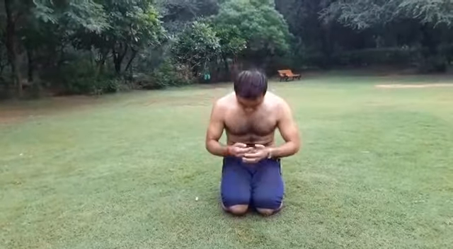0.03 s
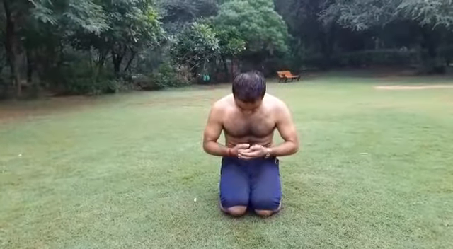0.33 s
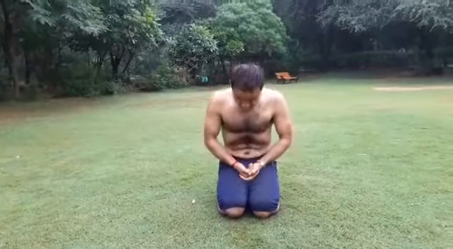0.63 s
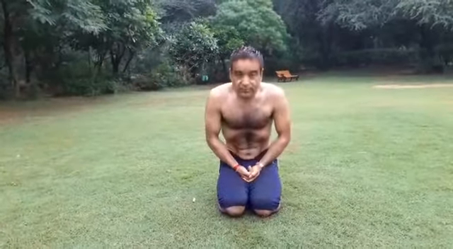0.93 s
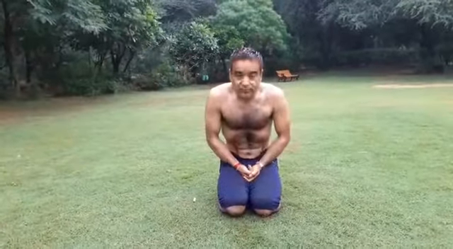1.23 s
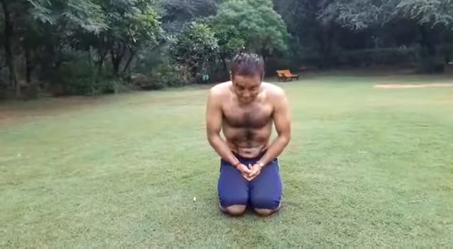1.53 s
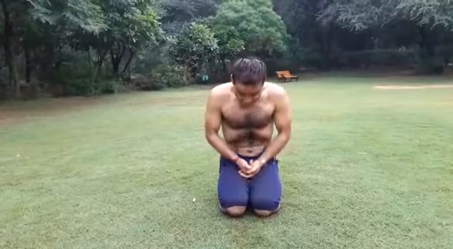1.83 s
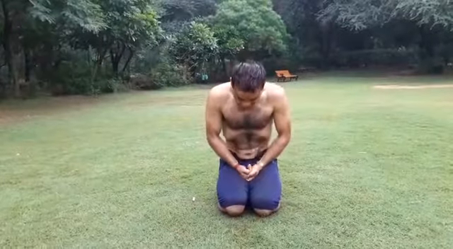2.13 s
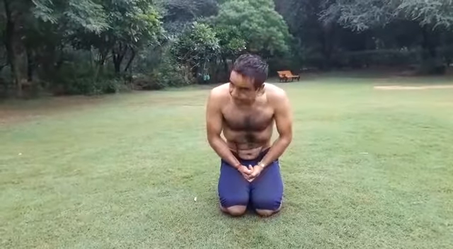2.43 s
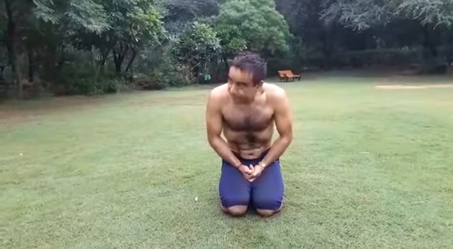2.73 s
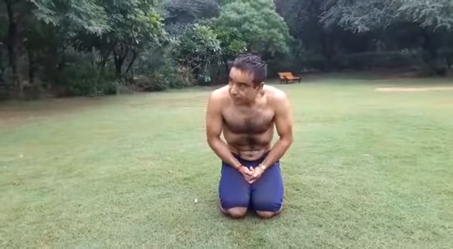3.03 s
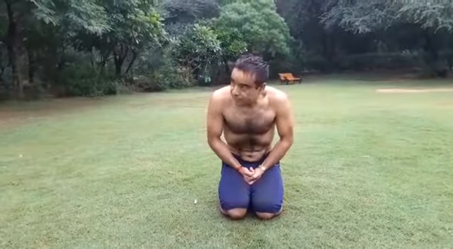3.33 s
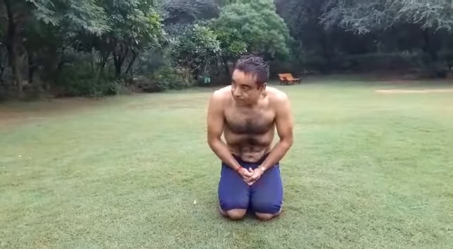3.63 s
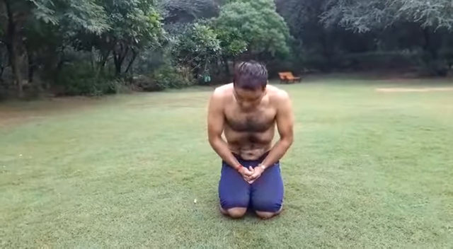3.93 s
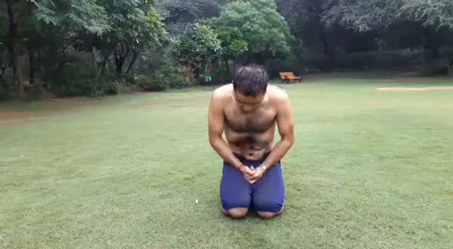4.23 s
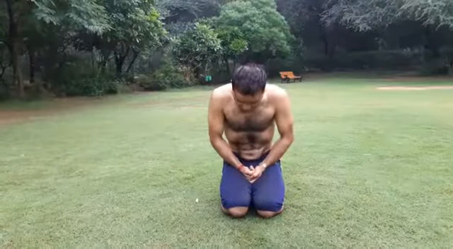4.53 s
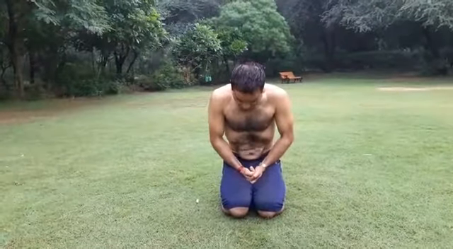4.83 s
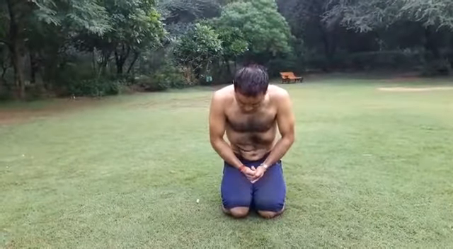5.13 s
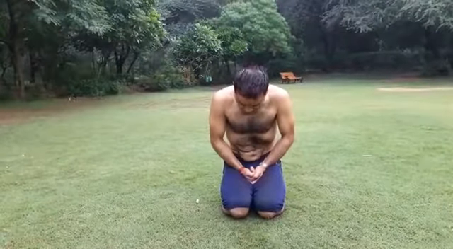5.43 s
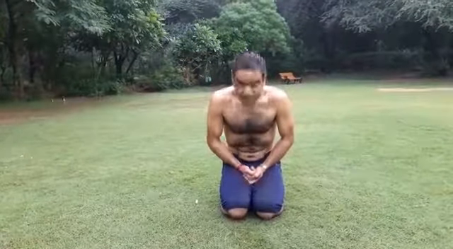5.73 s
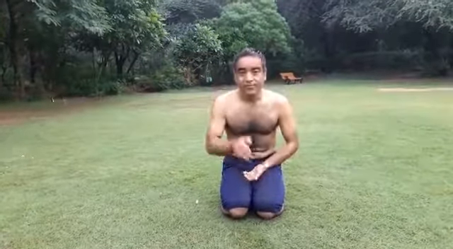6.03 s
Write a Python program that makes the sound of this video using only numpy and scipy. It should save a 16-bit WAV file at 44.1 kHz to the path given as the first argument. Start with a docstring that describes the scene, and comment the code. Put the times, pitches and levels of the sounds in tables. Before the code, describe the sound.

A low bump of wind hits the microphone at the very start, with a brief rustle and the fading echo of a bird call. Parakeets then screech from deep in the trees of a park, each note about a tenth of a second long, high, harsh and raspy, flicking upward at the end. These distant, echoing calls come at about 0.2, 1, 1.9 and 2.7 seconds, with fainter ones between. From 3.5 seconds one bird is close, louder and sharper, calling again at 4.2, 4.9, 5.4 and 6 seconds. Underneath, far traffic makes a steady low rumble, and an engine drone swells around 2 seconds and recedes. Light gusts buffet the microphone, most clearly near 1 and 2 seconds, and faintly stir the leaves. At about 5.8 seconds a far bird adds one very faint, short whistle.

```python
"""A bump of wind and a rustle come first; parakeets screech deep in the trees, then one close by.
Each note starts fairly clean, pulses into a rasp as the syrinx flutters, and ends on a higher tone;
throat and beak filter it, and the foliage scatters it back. Underneath, far traffic rumbles with an
engine drone, light gusts buffet the microphone and stir the leaves, and late on a far bird whistles."""
import sys
import numpy as np
from scipy import signal
from scipy.fft import rfft, irfft, next_fast_len
from scipy.io import wavfile
from scipy.ndimage import map_coordinates

SR = 44100
rng = np.random.default_rng(int(sys.argv[2]) if len(sys.argv) > 2 else 0)


def digitize_waveform(pressure):
    """Quantize a signal to 16-bit integers and store it at the path in sys.argv[1].

    Rows of a 2-D input are taken as channels; values are limited to [-1, 1].
    """
    field = np.atleast_2d(pressure).T
    bounded = np.clip(field, -1, 1)
    quanta = np.round(bounded * 32767).astype(np.int16)
    wavfile.write(sys.argv[1], SR, quanta)


N = 267863
TOP_HZ = 15900  # upper band limit

# spectra of far roads and of the hiss over the lawn: (frequency [Hz], relative density [dB])
ROAD_SPECTRUM = [(22, -43), (32, -51), (48, -3), (65, -17), (110, -0.5), (150, -4.5), (210, -4),
                 (315, -2.5), (376, -10.5), (500, -17), (700, -26), (1200, -32), (2600, -100)]
HISS_SPECTRUM = [(410, -28), (700, -9), (808, -7), (984, -8.5), (1060, -10.5), (1520, -9.5), (1730, -14),
                 (1890, -14), (2050, -18.5), (4050, -28), (5840, -30.5), (7390, -14.5), (9110, -37.5),
                 (16000, -43.5)]
# left-right likeness of the ambient field and of wind buffeting: (frequency [Hz], coherence [0-1])
FIELD_COHERENCE = [(30, 1), (80, 1), (250, 0.89), (600, 0.43), (1500, 0), (8000, 0.06)]
WIND_COHERENCE = [(30, 0.1), (100, 0.73), (250, .2)]
# gusts at the microphone: (peak time [s], width [s], level [dB])
GUST_PEAKS = [(0.217, 0.22, -40), (0.645, 0.035, -38.5), (0.805, 0.16, -40), (1.01, 0.048, -30),
              (1.123, 0.1, -34.5), (1.644, 0.26, -43), (1.985, 0.098, -29.5), (2.212, 0.056, -36),
              (2.397, 0.05, -73), (3.185, 0.29, -38.5), (5.05, 0.12, -40.5), (5.467, 0.069, -41)]
# short bumps of wind: (time [s], level [dB])
BUMPS = [(0.0, -22.5), (0.162, -30), (0.185, -32.5)]
# spectra of buffeting, stirred leaves, bumps and the rustle: (frequency [Hz], relative density [dB])
BUFFET_SPECTRUM = [(20, -46.5), (32, -22), (50, -5.5), (100, 0.5), (135, -4.5), (200, -17.5), (400, -45),
                   (900, -120)]
LEAF_SPECTRUM = [(1200, -27.5), (2200, -6.5), (3300, -0.5), (4500, -7), (6000, -10), (8000, -9),
                 (10000, -27.5), (15500, -21.5)]
BUMP_SPECTRUM = [(35, -35), (110, -5.5), (240, -8.5), (500, -33.5), (1200, -40), (4000, -120)]
RUSTLE_SPECTRUM = [(600, -25), (1600, 1.0), (2500, -4), (6500, -21), (10000, -16), (15000, -15)]
# the far bird's note: (time [s], pitch [Hz], level [dB])
WHISTLE_COURSE = [(5.73, 1500, -83), (5.78, 1537, -63), (5.87, 1506, -63.5), (5.96, 1470, -67),
                  (6.05, 1490, -77)]
# main decay of the tree echo: (frequency [Hz], reverberation time [s])
ECHO_T60 = [(1000, 0.66), (2800, 0.59), (5300, 0.58), (8000, 0.57), (15000, 0.38)]
# colour of that echo: (frequency [Hz], gain [dB])
ECHO_COLOUR = [(1400, 1.5), (1900, 0), (2800, 10.5), (3500, 0.5), (4300, 4.5), (5400, -1), (7000, -2.5),
               (10000, 5.5), (15500, -0.5)]
# resonances of throat and beak: (frequency [Hz], gain [dB])
FORMANTS = [(1400, -15.5), (1800, -22.5), (2200, -27.5), (2600, -5), (2820, -4), (3550, -5.5), (4150, -7),
            (5400, -0.5), (6150, -13), (7000, -0.5), (8200, -6.5), (9400, -26), (12300, -12), (15500, -21)]
# turbulence in the rasp: (frequency [Hz], relative density [dB])
RASP_SPECTRUM = [(900, -39), (1700, -28.5), (2300, -46.5), (2750, -6.5), (3300, -21.5), (3900, -14),
                 (4500, -18), (5350, -2), (6000, -13.5), (6800, 4.5), (7500, -8), (8200, -10.5),
                 (9300, -24), (15500, -20)]
# course of a note: (position [0-1], pitch / opening pitch [ratio], effort [dB], roughness [capped at 1])
NOTE_COURSE = [(0, .985, 6, 0.34), (.1, .995, 0, 0.3), (.2, 1.005, 5, 0.69), (.35, 1.02, 3, 1.13),
               (.55, 1.035, 6, 0.99), (.72, 1.04, 6, 1.06), (.82, 1.04, 1.5, 0.5), (.92, 1.04, 7, 0.25),
               (1, 0.92, 8.5, 0)]
# its upper register: (position [0-1], pitch / closing pitch [ratio])
CLOSING_COURSE = [(.5, .965), (.72, .985), (.86, 1.003), (.93, 1), (1, .97)]
# parakeet notes: (time [s], length [s], opening pitch [Hz], closing pitch [Hz], direct level [dB],
# echo level [dB], treble tilt [dB/octave], period doubling [0-1], closing accent [dB])
CALLS = [ (-0.25, 0.12, 1362, 1750, -14, -26.5, 5.5, 0.1, -1.5),
         (0.134, 0.11, 1274, 1800, -85, -43, -6.5, .1, 1),
         (0.178, .09, 1360, 1776, -34.5, -28.5, -1, 0.2, 3.5),
         (0.569, .11, 1326, 1820, -60, -47.5, -2.5, 0, -14),
         (0.954, 0.082, 1347, 1755, -47, -29, 0, 0.3, 3),
         (1.422, 0.11, 1337, 1733, -50.5, -41.5, -2, 0.16, 1),
         (1.896, .083, 1348, 1740, -40.5, -27, 0, 0.48, 3),
         (2.478, 0.12, 1300, 1700, -54, -48, -3.5, 0, -2),
         (2.655, .076, 1343, 1745, -37, -26.5, 0.5, 0.73, 2),
         (3.513, .086, 1394, 1743, -19, -27.5, -0.8, 0.85, 1),
         (4.196, 0.08, 1360, 1763, -23, -27.5, 1, 0.22, 2.5),
         (4.912, 0.089, 1370, 1803, -19.5, -28, 1.5, .2, 3),
         (5.384, 0.071, 1368, 1787, -19, -28, 1, 0.1, 5), (6.022, 0.1, 1377, 1830, -21, -32, 0, 0.13, -3.5)]


def amp(db):
    """Decibels to amplitude ratio."""
    return 10 ** (np.asarray(db) / 20)


def unit(x):
    """Normalisation to rms 1."""
    return x / np.sqrt(np.mean(x ** 2) + 1e-20)


def along(points, hz):
    """Interpolation of (frequency, value) points on a log axis."""
    f, v = np.transpose(points)
    return np.interp(np.log(hz + 1), np.log(f + 1), v)


def curves(rows, at):
    """Linear interpolation of each later column against the first."""
    knots, *columns = np.transpose(rows)
    return [np.interp(at, knots, column) for column in columns]


def wobble(rate, size):
    """Smooth random modulation: a spline through `rate` knots a second."""
    knots = rng.standard_normal(int(size * rate / SR) + 4)
    return map_coordinates(knots, [np.arange(size) * rate / SR])


def filtered(x, response):
    """Linear filtering: the spectrum of x times a frequency response."""
    n = x.shape[-1]
    padded = next_fast_len(n + 8192)
    return irfft(rfft(x, padded) * response(np.fft.rfftfreq(padded, 1 / SR)), padded)[..., :n]


def add(track, x, start_s):
    """Superposition of x on the track from start_s on."""
    i = round(start_s * SR)
    lo, hi = max(i, 0), min(i + x.shape[-1], N)
    if hi > lo:
        track[:, lo:hi] += x[..., lo - i:hi - i]


def noise(spectrum, coherence=FIELD_COHERENCE):
    """Partially coherent stereo noise of rms 1: the mid-side balance sets the coherence."""
    def response(hz):
        angle = np.arccos(np.clip(along(coherence, hz), -1, 1)) / 2
        return amp(along(spectrum, hz)) * [np.cos(angle), np.sin(angle)]
    mid, side = filtered(rng.standard_normal((2, N)), response)
    return unit(np.array([mid + side, mid - side]))


def swell(t, peak_s, half_width_s):
    """Lorentzian curve for a distant passing source: 1 at closest approach."""
    return 1 / (1 + ((t - peak_s) / half_width_s) ** 2)


def traffic(t):
    """Broadband noise: far roads rumble with one slow swell, under a steady thin hiss."""
    road_db = -46.5 + 3.5 * swell(t, peak_s=2.87, half_width_s=1.02)
    return amp(road_db) * noise(ROAD_SPECTRUM) + amp(-60) * noise(HISS_SPECTRUM)


def engine(t, firing_hz=91.5, sag_hz_per_s=0.3):
    """Periodic firing gives two harmonics; the fundamental swells as the engine passes."""
    level_db = -51.5 + 12 * swell(t, peak_s=1.95, half_width_s=0.88)
    hz = firing_hz - sag_hz_per_s * t + 1.2 * wobble(9, N)
    phase = 2 * np.pi * np.cumsum(hz) / SR
    fundamental = amp(level_db - 0.5 * wobble(3.3, N)) * np.sin(phase)
    octave = amp(-54 + 1.14 * wobble(5.1, N)) * np.sin(2 * phase)
    return np.sqrt(2) * (fundamental + octave)


def wind(t, breeze_db=-42, fade_db_per_s=1.87, leaf_lag_s=0.34):
    """Breeze and gusts add in power at the microphone; leaves follow the gusts with a first-order lag."""
    gusts = [amp(db) * np.exp(-2 * ((t - s) / width) ** 2) for s, width, db in GUST_PEAKS]
    strength = np.linalg.norm([amp(breeze_db - fade_db_per_s * t), *gusts], axis=0)
    unevenness = amp(1.5 * np.array([wobble(12, N), wobble(12, N)]))
    settle = 1 / (leaf_lag_s * SR)
    leaf_motion = signal.lfilter([settle], [1, settle - 1], np.sum(gusts, axis=0))
    leaves = leaf_motion * amp(-21) * noise(LEAF_SPECTRUM)
    return strength * unit(unevenness * noise(BUFFET_SPECTRUM, WIND_COHERENCE)) + leaves


def wind_bumps(t, bump_t60=0.14, rustle_t60=1.0):
    """Exponentially decaying transients: puffs hit the microphone, the first with a rustle."""
    envelope = sum(amp(db - 60 * np.abs(t - s) / bump_t60) * np.clip((t - s) / 0.003, 0, 1)
                   for s, db in BUMPS)
    thuds = envelope * noise(BUMP_SPECTRUM)
    return thuds + amp(-50 - 60 * t / rustle_t60) * noise(RUSTLE_SPECTRUM)


def far_whistle(t):
    """Multipath fading: the trees blur the amplitude and phase of a distant bird's pure tone."""
    hz, db = curves(WHISTLE_COURSE, t)
    scatter = np.array([wobble(45, N) + 1j * wobble(45, N) for _ in range(2)])
    carrier = np.exp(2j * np.pi * np.cumsum(hz) / SR)
    tone = unit(np.real((1 + .5 * scatter) * carrier))
    return amp(db) * tone * (t > WHISTLE_COURSE[0][0])


def foliage(build_s=0.00057, near_t60=0.087, late_t60=0.54):
    """Impulse response of scattering: near branches, the main decay and a faint tail from farther off."""
    hz, t, spectra = signal.stft(rng.standard_normal((2, SR)), SR, nperseg=256)
    t60 = along(ECHO_T60, hz)[:, None]
    near = amp(2 - 60 * t / near_t60)
    main = amp(-60 * t / t60)
    late = amp(-27 - 60 * t / (late_t60 * t60 / np.mean(t60)))
    onset = 1 - np.exp(-t / build_s)
    tail = signal.istft(spectra * (near + main + late) * onset, SR, nperseg=256)[1]
    return filtered(tail, lambda f: amp(along(ECHO_COLOUR, f)))


def voice(pitch, doubling):
    """Source and filter: the throat shapes the harmonics; period doubling adds lines between them."""
    orders = np.arange(2, 23)[:, None] / 2
    hz = orders * pitch
    gain = amp(along(FORMANTS, hz)) * np.where(orders % 1, doubling, 1) * (hz < TOP_HZ)
    cycles = np.cumsum(hz, axis=1) / SR + rng.random(orders.shape)
    return unit(np.sum(gain * np.sin(2 * np.pi * cycles), axis=0))


def beak_opening(x, t, open_s=0.0087, edge_hz=2750):
    """Time-varying filter: a note starts thin, until its low formant comes in."""
    low_formant = filtered(x, lambda hz: (hz > edge_hz / 2) / (1 + (hz / edge_hz) ** 12))
    return x - np.exp(-(t / open_s) ** 2) * low_formant


def screech(length, open_hz, close_hz, doubling, accent_db, flutter_hz=143, jitter=0.016):
    """Modulation and register break: the syrinx flutters into a rasp, then jumps to a higher tone."""
    t = np.arange(int(length * SR)) / SR
    position = t / length
    bend, effort_db, rough = curves(NOTE_COURSE, position)
    closing_bend, = curves(CLOSING_COURSE, position)
    rough = np.clip(rough, 0, 1)
    flutter = np.cos(2 * np.pi * flutter_hz * t + 0.057 * wobble(41, len(t)))
    # cycle-to-cycle jitter smears the high harmonics most
    unsteady = 1 + rough * (jitter * wobble(1416, len(t)) + 0.0024 * flutter)
    upper_share = 1 / (1 + np.exp((0.71 - position) / 0.049))  # the break, 71% through the note
    low_tone = np.sqrt(1 - upper_share) * voice(open_hz * bend * unsteady, doubling)
    high_tone = np.sqrt(upper_share) * amp(accent_db) * voice(close_hz * closing_bend * unsteady, 0)
    tone = (low_tone + high_tone) * (1 - .5 * rough) * amp(rough * flutter)
    turbulence = unit(filtered(rng.standard_normal(len(t)), lambda hz: amp(along(RASP_SPECTRUM, hz))))
    rasp = turbulence * rough * amp(5 * flutter)  # one burst for each flutter cycle
    edges = np.clip(t / 0.0019, 0, 1) * np.clip((length - t) / 0.0008, 0, 1)
    return unit(beak_opening(tone + rasp, t) * amp(effort_db) * edges)


def parakeets(left_lead_s=0.000204, pan_db=1.3):
    """Direct and reverberant sound: each note arrives straight and from the trees, the ratio cueing depth."""
    out = np.zeros((2, N))
    sides = np.array([[-1], [1]])
    for start_s, length, open_hz, close_hz, direct_db, echo_db, tilt, doubling, accent_db in CALLS:
        note = screech(length, open_hz, close_hz, doubling, accent_db)
        note = unit(filtered(note, lambda hz: amp(tilt * np.log2(np.maximum(hz, 2500) / 5000))))
        direct = filtered(note, lambda hz: np.exp(-1j * np.pi * hz * left_lead_s * sides))
        echo = signal.fftconvolve(note[None], foliage(), axes=1)
        echo *= np.linalg.norm(direct) / np.linalg.norm(echo)
        add(out, amp(direct_db) * direct, start_s)
        add(out, amp(echo_db) * echo, start_s)
    return out * amp(pan_db * sides)


def scene():
    """Superposition of the birds and a low background, both a little louder on the right."""
    t = np.arange(N) / SR
    birds = parakeets() + far_whistle(t)
    background = engine(t) + traffic(t) + wind(t) + wind_bumps(t)
    return birds + background * amp([[-.5], [.5]])


def record(dry):
    """Band-pass filtering removes the deepest rumble and the highest treble."""
    low_cut = lambda hz: 1 - 1 / (1 + (hz / 33) ** 4)
    high_cut = lambda hz: np.clip((TOP_HZ - hz) / 400 + .5, 0, 1)
    return filtered(dry, lambda hz: low_cut(hz) * high_cut(hz))


dry = scene()
out = record(dry)
digitize_waveform(out)
```